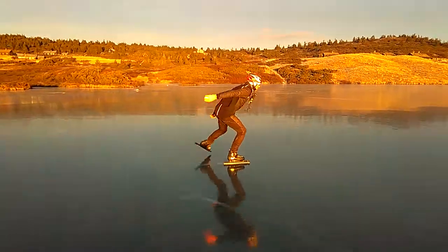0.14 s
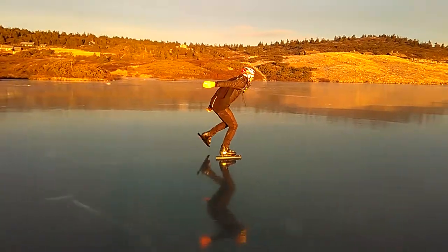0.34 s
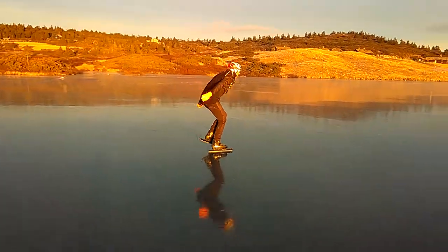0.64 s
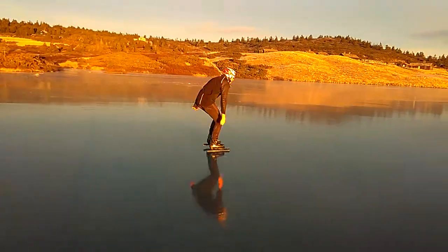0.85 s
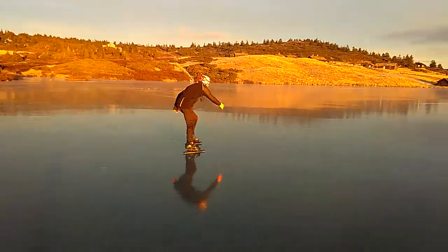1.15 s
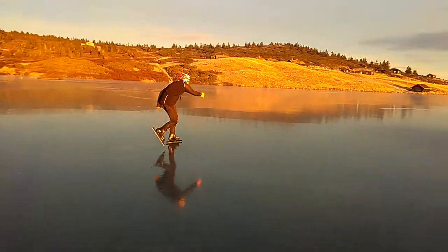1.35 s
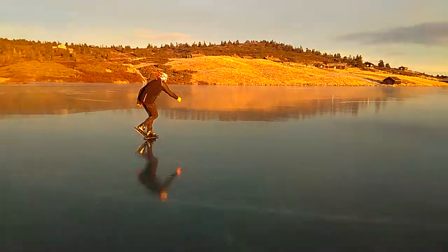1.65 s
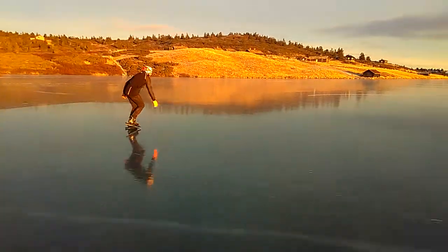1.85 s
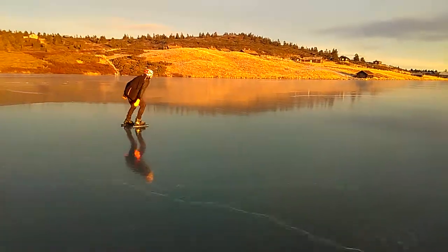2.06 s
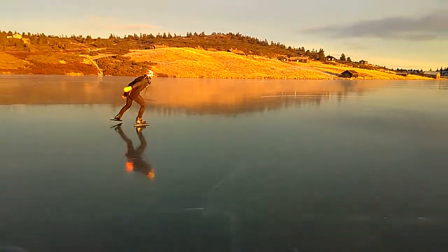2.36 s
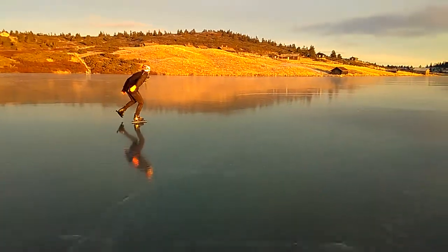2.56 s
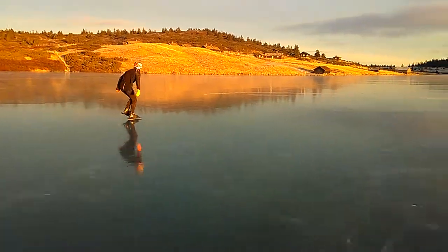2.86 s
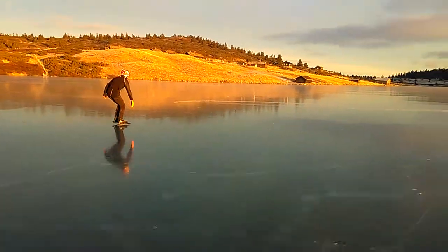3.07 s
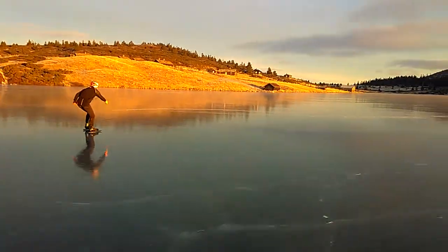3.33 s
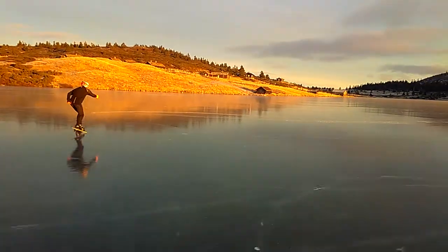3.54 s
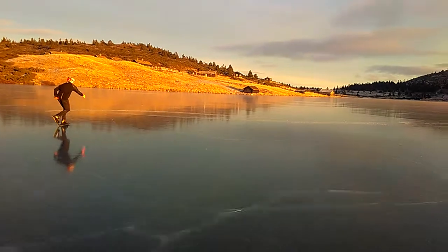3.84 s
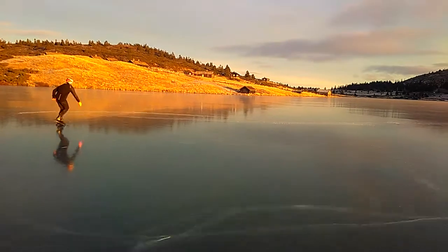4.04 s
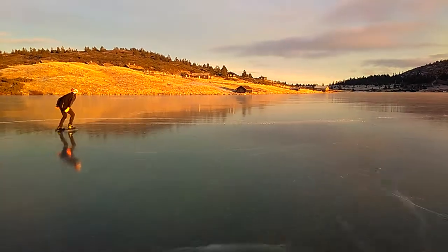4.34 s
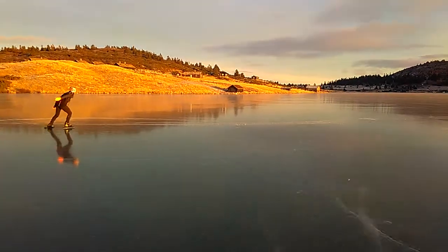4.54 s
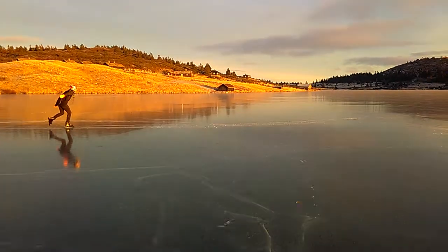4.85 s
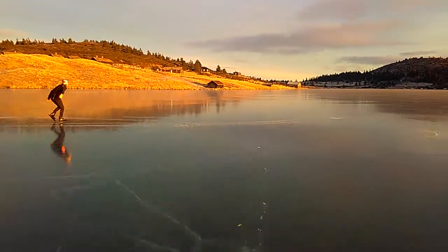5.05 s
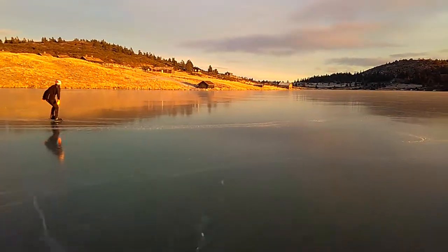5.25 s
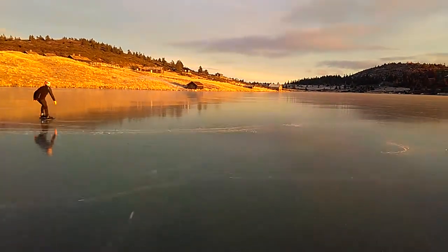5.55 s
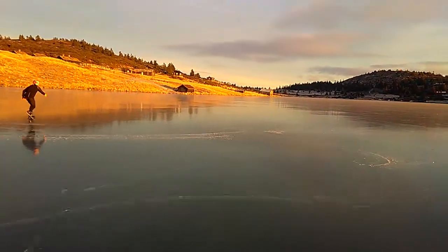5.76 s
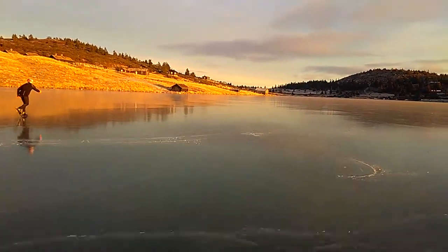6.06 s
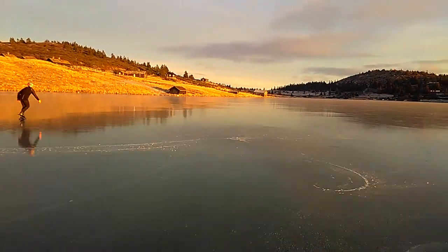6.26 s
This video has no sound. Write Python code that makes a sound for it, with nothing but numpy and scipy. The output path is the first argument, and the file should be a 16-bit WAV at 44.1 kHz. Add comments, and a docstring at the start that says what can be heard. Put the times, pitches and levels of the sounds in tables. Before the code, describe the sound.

Long steel skate blades run over bare lake ice, close to a moving microphone. Wind buffets first, then hollow knocks and scrapes arrive, crowding into a loud clatter through the middle. A brief lull follows, then looser clusters of knocks and crunches. Low wind rumble swells in separate gusts on the left and right throughout, with no echo from the open lake.

```python
"""Skate blades hiss, scrape and knock across a frozen lake while wind buffets two moving microphone ports.
Gliding edges are coloured friction noise, which grows louder and rasps where an edge bites.
Each knock over a bump is a short falling ring of the ice sheet with a thud and chipped crumbs;
a loaded edge splinters the ice in bright crackles, and a blade set down hard rings.
A headwind and single gusts are noise, separate at each port; loud wind and hard knocks overload the input."""
import sys
import numpy as np
from scipy import signal
from scipy.fft import rfft, irfft
from scipy.io import wavfile
from scipy.ndimage import uniform_filter1d

SR = 44100
rng = np.random.default_rng(int(sys.argv[2]) if len(sys.argv) > 2 else 0)


def master(y):
    """Save y as 16-bit WAV."""
    cut = np.clip(np.atleast_2d(y).T, -1, 1)
    pcm = np.round(cut * 32767)  # scale
    wavfile.write(sys.argv[1], SR, pcm.astype(np.int16))


N = 282240

# hard blade knocks: (time [s], level [dB], middle pitch [Hz], ring length [ms],
# delay of the blade's second contact [ms], thud relative to the knock [dB], crunch of chipped ice [dB])
KNOCKS = [(0.4614, -6.5, 1750, 1.5, 1.06, 1, -24), (0.6, 2, 1190, 1, 1.2, -6.5, -30.0),
          (0.669, -7, 980, 1.2, 1.2, -2, -29), (0.9212, -4, 1210, 2.9, 1.08, -3, -17.5),
          (0.9576, 0.5, 870, 1.84, 2.37, -17, -35.0), (0.997, -7.5, 1140, 1.4, 0.68, 1, -24),
          (1.155, 0.5, 1150, 1.5, 1.46, -9, -26), (1.17, -1.5, 700, 1.4, 0.54, -8, -19),
          (1.1996, -8, 1200, 2.5, 1.07, 5, -8), (1.2681, -4.5, 1430, 1.4, 2.97, -1, -25),
          (1.356, -5.5, 1190, 2.8, 1.94, -4, -13.5), (1.377, -11, 1030, 2.9, 2.6, 7, -33),
          (1.4021, 7.5, 1270, 1.5, 1.1, -11, -8), (1.4367, -3, 1640, 1.1, 0.81, -5, -12),
          (1.5177, -3, 990, 3.5, 1.8, 2.5, -13), (1.5461, -9, 900, 1.4, 1.6, 2, -26),
          (1.585, -0.5, 1305, 3.8, 0.86, 0.5, -17), (1.63, -3, 1170, 2, 1.04, -0.5, -15),
          (1.6817, -3, 930, 1.25, 1.33, -4, -29), (1.7045, -2.5, 720, 2.2, 0.54, -13, -38),
          (1.7624, 5, 1030, 1.33, 1.8, -23, -9.5), (1.8103, 4.5, 665, 3.8, 0.76, -15, -13),
          (1.84, -6.5, 660, 1.4, 1.8, 4, -21), (1.946, -13, 1120, 2.5, 0.91, -2, -21),
          (1.9673, 5, 1590, 1.1, 0.9, -6.5, -19), (2.024, 8.5, 1030, 1.84, 0.45, -21, -34),
          (2.0644, -6, 1580, 1.4, 0.99, -9, -20), (2.1575, 4.5, 1060, 1.2, 1.8, -15, -20),
          (2.1871, 3.5, 1010, 1.5, 0.34, -4, -18), (2.2227, -3.5, 1200, 2.2, 0.5, 0.5, -46),
          (2.2678, 0.5, 1260, 1.46, 1.5, -2.5, -35), (2.304, 0.5, 1440, 1.2, 1.44, -8, -40),
          (2.3646, 10, 1350, 1.05, 1.37, -20, -33), (2.4001, -3, 1490, 2.3, 0.93, -4, -17.5),
          (2.4264, 9, 1070, 0.88, 0.98, -9, -8.5), (2.4463, -1, 1610, 1.9, 0.9, -8, -13),
          (2.4624, -3.5, 790, 1.7, 2.25, -18, -20), (2.4936, 5, 1260, 1.13, 0.65, -1.5, -8),
          (2.5455, 2.5, 1230, 1.6, 1.47, -7, -14), (2.581, 6, 1320, 2.4, 0.97, -16, 1.5),
          (2.5972, -2, 1250, 2.5, 0.8, -14, -15), (2.6115, 2, 1890, 1.1, 0.77, -29, -3.5),
          (2.6601, -8.5, 940, 1.05, 1.4, -2, -25), (2.7102, -6, 900, 1.8, 1.3, -8, -38),
          (2.7198, 3.5, 940, 1.34, 1.58, -11, -27), (2.7707, -8, 1070, 4.4, 0.7, 4, -41.0),
          (2.8295, -14, 1370, 2.7, 0.86, -18, -42), (2.8482, 1, 1020, 1.16, 1.5, -11, -36),
          (2.8845, -6, 1340, 2.5, 0.93, -14, -23), (2.9238, 7.5, 1180, 1.5, 1.47, -19, -3.5),
          (2.9509, 3, 920, 5, 0.49, -5, -14), (2.9872, -7, 1240, 4.8, 1.3, 4, -15),
          (3.0462, 2.5, 680, 0.98, 2, -3, -10), (3.1246, 2, 1140, 1.2, 1.34, -10, -11),
          (3.179, -3, 1340, 1.5, 2.3, 0, -6.5), (3.1951, 2, 1065, 2.3, 1.22, -10, -1.5),
          (3.23, -2.5, 1380, 4.6, 0.64, 2.5, -28.0), (3.262, -8, 1380, 2.8, 0.7, 2, -28),
          (3.2741, -3.5, 985, 2.6, 1.95, 0.5, -9.5), (3.2872, 1.5, 1400, 2.1, 0.76, -0.5, -24),
          (3.3559, -10, 1070, 2.4, 0.78, 2, -28), (3.4376, -9, 1000, 4, 3.27, -2, -13.5),
          (3.4845, -14.5, 970, 4.7, 2.03, 9, -12), (3.5696, 8.5, 1230, 2.24, 1.39, -14, -12),
          (3.603, -2.5, 1550, 3.1, 0.92, -4.5, -35.0), (3.636, 5, 1520, 0.95, 0.97, -8.5, -14),
          (3.6769, 2, 760, 3.4, 0.63, -12, -33.0), (3.705, 2, 1086, 4.3, 1.25, -2, -25),
          (3.752, 0.5, 930, 1.5, 1.95, -22, -16), (3.7669, -2.5, 1410, 1.4, 0.96, 4, -9),
          (3.8072, -3, 1270, 1.9, 0.75, -21, -12), (3.8306, 2, 1710, 0.97, 0.86, -3, -4),
          (3.8915, -4, 670, 1.8, 1.3, -6, -10.5), (3.921, 3.5, 1120, 1.75, 1.42, -28, -5),
          (3.931, -8, 1080, 2.9, 1.84, 3, -30), (3.953, -1, 1260, 4.2, 2, 1.5, -13),
          (3.9736, -3.5, 1140, 2.4, 1.4, 0, -11), (3.9968, -7.5, 1260, 3.7, 2.73, -2, -32),
          (4.0271, 0.5, 1320, 1.44, 0.88, -9, -11.0), (4.053, -2.5, 1570, 0.85, 0.74, -9, -29),
          (4.244, -7, 1280, 1.7, 0.6, -23, -31), (4.3865, -5.5, 1520, 2.2, 0.85, -4.5, -18.5),
          (4.4373, -8.5, 834, 1.6, 1.2, -6, -16), (4.55, -10.5, 1080, 5, 3.3, -11, -27),
          (4.6289, -8.5, 960, 2.4, 1.37, -10, -49), (4.7366, 1.5, 1290, 2.6, 0.94, -0.5, -8.5),
          (4.765, -9, 1360, 2, 0.97, -1, -21), (4.8159, -8.5, 1720, 2.2, 0.97, 7, -9),
          (4.8371, -9, 1350, 3.3, 1.15, 7, -19), (4.8875, -3, 1800, 1.5, 0.91, -14, -18),
          (4.9152, 1.5, 1930, 1.1, 0.82, -2, -12), (4.9319, -8, 1040, 1.2, 1.2, -4, -16),
          (4.94, -8.5, 1330, 3.5, 0.9, 2.5, -18), (5.0168, -10.5, 930, 1.7, 2, 6.5, -26.0),
          (5.0511, -1.5, 1090, 1.2, 1.63, -8, -25), (5.1275, 2.5, 1510, 1.2, 0.89, -18, -7.5),
          (5.2467, -10.5, 1610, 2.4, 0.88, -28, -28), (5.265, -18, 970, 3.6, 1.9, 3, -21.5),
          (5.3131, -6, 1500, 0.99, 0.74, 1.5, -8.5), (5.3623, -4, 1320, 1.9, 1.5, -0.5, -11),
          (5.377, 6, 680, 0.61, 0.87, -17, -13), (5.4188, 1.5, 1170, 2.1, 1.85, 1, -12),
          (5.4294, -0.5, 1060, 2, 1.26, -11, -17), (5.4653, -2.0, 1205, 5.1, 1, 2, -13.5),
          (5.5026, -6, 1310, 3.3, 0.95, 0.5, -32), (5.5369, -2, 690, 2.3, 0.63, -5, -24),
          (5.5683, -4, 1980, 1.8, 0.58, -7.5, -3.5), (5.607, -9, 895, 2.4, 2, -18, -37),
          (5.6452, -2.5, 1200, 2.4, 0.84, -5, -9), (5.773, -17.5, 960, 5.8, 1.9, -6, -36),
          (5.8326, -12.5, 1000, 3.9, 1.8, -1, -41), (5.909, -8, 1150, 3.3, 2.66, -28, -32.0),
          (5.9436, -2.5, 990, 2.2, 0.63, -4.5, -20.0), (5.9889, -7, 760, 2, 0.67, 4.5, -28),
          (6.011, -18, 950, 1.3, 1, 5, -36), (6.032, -5.5, 1290, 2.3, 0.88, 2.5, -12.5),
          (6.1392, -2, 1270, 2.1, 0.84, -10, -15), (6.3071, -5.5, 830, 4.5, 0.75, -8, -14.5),
          (6.356, -6.5, 1270, 1.6, 0.96, -23, -17)]
# spectrum of ice grinding under the blade: (frequency [Hz], relative level [dB])
GRIND = [(200, -3.5), (600, -5), (1000, 4.5), (1500, 9), (2600, -5), (4000, -19), (7000, -26.5),
         (15000, -38)]
# spectrum of the shaving edge: (frequency [Hz], relative level [dB])
HISS = [(500, -26), (1500, 18.5), (3000, 0.5), (4500, 9), (6000, 4.5), (9000, 4.5), (12000, 3),
        (15000, 4.5)]


def from_db(db):
    """Turns decibels into gain."""
    return 10 ** (np.asarray(db) / 20)


def unit(x):
    """Scales to rms 1."""
    return x / np.sqrt(np.mean(x ** 2) + 1e-20)


def curve(table):
    """Reads the columns of a time table, sample by sample."""
    s, *columns = np.transpose(table)
    return [np.interp(np.arange(N) / SR, s, column) for column in columns]


def spectrum_at(points, hz):
    """Reads a spectrum on a log-frequency axis."""
    f, db = np.transpose(points)
    return np.interp(np.log(hz + 1), np.log(f), db)


def coloured(points):
    """Unrelated noise for the two ports, with the given spectrum."""
    gain = from_db(spectrum_at(points, np.fft.rfftfreq(N, 1 / SR)))
    white = rng.standard_normal((2, N))
    return unit(irfft(rfft(white) * gain, N))


def wander(rate_hz):
    """Smooth random movement of rms 1, mostly slower than the rate."""
    hz = np.fft.rfftfreq(N, 1 / SR)
    white = rng.standard_normal(N)
    return unit(irfft(rfft(white) * np.exp(-(hz / rate_hz) ** 2), N))


def shared(pair, likeness):
    """Makes the two channels partly alike."""
    c = np.clip(likeness, 0, 1)
    return np.array([pair[0], c * pair[0] + np.sqrt(1 - c ** 2) * pair[1]])


def add(mix, s, sound):
    """Mixes a sound in at time s."""
    part = mix[..., max(round(s * SR), 0):][..., :sound.shape[-1]]
    part += sound[..., :part.shape[-1]]


def random_hits(sizes, per_s, decay_s):
    """Sudden starts at random moments, each with a quick exponential decay."""
    starts = sizes * (rng.random(N) < per_s / SR)
    return signal.lfilter([1], [1, -np.exp(-1 / (decay_s * SR))], starts)


def patchy(x, depth_db, span_hz):
    """The ice under the edge keeps changing: patches of the spectrum swell and fade."""
    z = signal.stft(x, nperseg=512)[2]
    field = uniform_filter1d(rng.standard_normal(z.shape[1:]), size=6, axis=1)
    field = unit(uniform_filter1d(field, max(round(span_hz * 512 / SR), 1), axis=0))
    return signal.istft(z * from_db(depth_db * field), nperseg=512)[1][:, :N]


def wind_levels():
    """Gains of rumble and eddies at each port: the headwind, and gusts that swell and fade, leaning to a side."""
    # headwind: (time [s], rumble [dB], fast eddies [dB], left minus right [dB])
    headwind = [(0.0, -27, -11, 8), (0.45, -21.5, -15, 3), (1.45, -20, -14.5, 2.5), (2.0, -17, -24.5, -0.5),
                (2.9, -21.5, -25, -5), (3.3, -16.5, -34.5, -0.5), (3.95, -21.5, -24.5, -3.5),
                (4.25, -17, -27, 1.5), (5.05, -19.5, -22, -6), (5.45, -23, -36.5, -5),
                (5.8, -28, -26.5, -23), (6.05, -29, -26, 11.5), (6.4, -16, -42, -5)]
    # gusts: (peak time [s], length [s], rumble [dB], fast eddies [dB], left minus right [dB])
    gusts = [(0.043, 1, -13, -8, 21), (0.476, 0.36, -11, -1, -25), (0.67, 1, -10, -16.5, -21),
             (0.832, 0.32, -10, -7.5, 26), (1.1, 0.25, -8.5, -4, -8), (1.234, 0.17, -5, -4.5, 1),
             (1.646, 0.18, -11.5, -32, 20), (1.774, 0.27, -12, -10.5, -22), (1.94, 0.2, -26, -12.5, -21),
             (2.05, 0.21, -8.5, -27, -25), (2.4, 0.66, -11.5, -22, 4), (2.697, 0.19, -5, -9.5, -17),
             (3.118, 0.24, -6.5, -12.5, -8.5), (3.367, 0.2, -4, -8, -25), (3.532, 0.18, -8, -14, -8),
             (3.793, 0.4, -10, -11, -6), (4.08, 0.26, -12, -37, 12), (4.183, 0.12, -7.5, -6, -14),
             (4.46, 0.23, -8, -11.5, -28), (4.816, 0.2, -7.5, -20, -26), (5.19, 0.2, -10.5, -36, 0),
             (5.295, 0.17, -12.5, -31, 18), (5.628, 0.18, -15, -27, 10), (5.868, 0.36, -6, -30, -18),
             (6.106, 0.15, -9.5, -20, 1), (6.2, 0.52, -13.5, -24.5, -11), (6.341, 0.14, -12, -11.5, -10)]
    rumble_db, eddy_db, side_db = curve(headwind)
    power = (from_db([rumble_db, eddy_db])[:, None] * from_db([side_db / 2, -side_db / 2])) ** 2
    t = np.arange(N) / SR
    for s, length, gust_rumble_db, gust_eddy_db, lean_db in gusts:
        during = abs(t - s) < length / 2
        swell = np.cos(np.pi * (t[during] - s) / length) ** 2
        ports = from_db([lean_db / 2, -lean_db / 2])
        gains = np.outer(from_db([gust_rumble_db, gust_eddy_db]), ports / np.linalg.norm(ports))
        power[..., during] += (gains[..., None] * swell) ** 2
    return np.sqrt(power)


def swelling(depth_db, rate_hz, limit=1.46):
    """A gain of rms 1 for each port that rises and falls by chance, its peaks held down."""
    chance = np.array([wander(rate_hz), wander(rate_hz)])
    return unit(from_db(depth_db * np.minimum(chance, limit)))


def flow(points, span_s, firmness):
    """Turbulence with its slow level swings evened out, so that the wind gains set its strength."""
    noise = coloured(points)
    power = uniform_filter1d(noise ** 2, int(span_s * SR) + 1, axis=1)
    return unit(noise / (abs(power) + 1e-6) ** (firmness / 2))


def wind(burst_db=6.5, burst_hz=30, swirl_db=-1.0, lump_db=2.0, lump_hz=12, strongest=0.96):
    """Big slow eddies rumble; small fast ones hit each port in bursts and break into a swirl when strong."""
    # spectra of big eddies, small eddies and swirling air: (frequency [Hz], relative level [dB])
    rumble_spectrum = [(15, -57), (30, -32), (45, -7), (58, 0), (100, -4.5), (160, -12), (300, -28),
                       (700, -53.5)]
    eddy_spectrum = [(50, -6.5), (130, -2.5), (220, -0.5), (330, -6), (500, -16.5), (750, -25), (2000, -73)]
    swirl_spectrum = [(120, -20), (320, -7), (500, 6), (850, -14.5), (1500, -13), (3000, -33), (8000, -64)]
    rumble_gain, eddy_gain = wind_levels()
    bursts = eddy_gain * swelling(burst_db, burst_hz)
    lumps = swelling(lump_db, lump_hz)
    rumble = rumble_gain * lumps * flow(rumble_spectrum, span_s=0.101, firmness=1.0)
    eddies = bursts * lumps * flow(eddy_spectrum, span_s=0.036, firmness=0.52)
    # the swirl grows with the square of the bursts, up to a limit
    swirl = from_db(swirl_db) * np.minimum(bursts, 0.3) ** 2 * coloured(swirl_spectrum)
    return strongest * np.tanh((rumble + eddies) / strongest) + swirl


def blade_levels(bite_s=0.0024, let_go_s=0.014):
    """Gains of hiss, grind and rasp: the base glide, and each scrape with its attack, hold and release."""
    # base glide, ahead of the layer trims: (time [s], edge hiss [dB], ice grind [dB], rasp [dB])
    base_glide = [(0.0, -30, -32, -39), (0.55, -47, -31.5, -47), (1.1, -37, -28.5, -46),
                  (1.9, -34, -30.5, -41), (2.8, -32, -27.5, -57), (3.45, -38, -28.5, -47),
                  (4.05, -35, -35, -45), (4.33, -39.5, -35.5, -52), (4.65, -38.5, -28.5, -55),
                  (5.1, -41, -32, -64), (5.85, -36, -36, -72), (6.4, -34, -31.5, -36)]
    # scrapes, where an edge bites, ahead of the trims:
    # (start [s], length [s], hiss [dB], grind [dB], rasp [dB])
    scrapes = [(0.0, 0.032, -33, -55, -28), (0.564, 0.1, -40, -25.5, -35.5),
               (0.917, 0.095, -30.5, -23.5, -33), (1.188, 0.093, -33, -40, -30),
               (1.284, 0.194, -31, -48, -33), (1.497, 0.2, -34.5, -24.5, -30.5),
               (1.752, 0.11, -40, -20, -32), (2.176, 0.033, -31, -12, -31), (2.576, 0.016, -16, -9, -13.5),
               (2.605, 0.016, -30, -28, -28), (2.913, 0.047, -29, -34, -24.5), (3.157, 0.15, -36, -21, -33),
               (3.562, 0.177, -26.5, -22, -50), (3.793, 0.29, -37, -31.5, -61),
               (4.802, 0.18, -36, -31, -60), (5.338, 0.17, -33, -30.5, -40), (5.561, 0.15, -35, -32.5, -58),
               (6.01, 0.062, -41, -28, -55),]
    t = np.arange(N) / SR
    power = from_db(curve(base_glide)) ** 2
    for start, length, *levels_db in scrapes:
        age = t[:round((length + 8 * let_go_s) * SR)]
        attack = np.minimum(age / bite_s, 1)
        release = np.exp(-np.maximum(age - length, 0) / let_go_s)
        add(power, start, np.outer(from_db(levels_db), attack * release) ** 2)
    return np.sqrt(power)


def scrape(points, likeness, flutter_db):
    """Friction noise of rms 1 that flutters with the pressure and breaks into grains."""
    noise = patchy(shared(coloured(points), likeness), depth_db=3.6, span_hz=700)
    grains_db = 2.6 * wander(rate_hz=900)
    pressure_db = flutter_db * wander(rate_hz=36)
    return unit(noise * from_db(pressure_db + grains_db))


def slips(per_s=130, spread_db=-1.0, decay_s=0.007):
    """The biting edge sticks and slips: an envelope of rms 1 made of sudden starts and quick decays."""
    sizes = from_db(spread_db * rng.uniform(-0.92, 1, N))
    return unit(random_hits(sizes, per_s, decay_s))


def glide(hiss, grind, rasp, hiss_trim_db=0.5, rasp_trim_db=3.5, grind_trim_db=-6.0):
    """The steel edge shaves the ice: fine hiss, a rasp that comes in slips and a low grind."""
    # spectrum of a blade set on edge: (frequency [Hz], relative level [dB])
    rasp_spectrum = [(1500, -9), (2600, -5), (4000, 20), (5000, 5), (6000, 5), (7500, -23), (12000, -24)]
    shaving = hiss * scrape(HISS, likeness=0.057, flutter_db=2.5)
    rasping = rasp * slips() * scrape(rasp_spectrum, likeness=0.23, flutter_db=3.0)
    grinding = grind * scrape(GRIND, likeness=0.4, flutter_db=6.0)
    return (from_db(hiss_trim_db) * shaving + from_db(rasp_trim_db) * rasping
            + from_db(grind_trim_db) * grinding)


def scratches(hiss, per_s=90, scratch_db=0.0, spread_db=2.5, decay_s=0.0041):
    """Tiny flakes snap off under the edge, the stronger the harder it shaves."""
    sizes = from_db(spread_db * np.minimum(rng.exponential(1, N), 3))
    bursts = random_hits(sizes, per_s, decay_s)
    return from_db(scratch_db) * hiss * bursts * shared(coloured(HISS), likeness=0.14)


def chatter(grind, per_s=65, chatter_db=4.5):
    """Small bumps tick under the loaded blade at random, louder as it grinds, in shifting colours."""
    sizes = from_db(rng.uniform(-6, 6, N))
    ticks = random_hits(sizes, per_s, decay_s=0.003)
    ice = unit(patchy(shared(coloured(GRIND), likeness=0.75), depth_db=5.0, span_hz=350))
    return from_db(chatter_db) * grind * ticks * ice


def crackles(crackle_db=3.5):
    """The loaded edge splinters the ice in sudden, grainy noise bursts of shifting colour."""
    # crackles, ahead of the trim crackle_db: (time [s], decay [s], level [dB])
    splinterings = [(0.9394, 0.0058, -25), (1.202, 0.011, -16.5), (1.255, .007, -26), (1.2896, 0.013, -21),
                    (1.312, 0.0065, -23), (1.335, 0.018, -23), (1.4996, 0.0046, -24), (1.5445, 0.0062, -20),
                    (1.588, .007, -19), (1.6535, 0.0053, -16.5), (1.6964, .005, -17), (5.633, 0.0064, -19),
                    (6.034, 0.0053, -19), (6.202, 0.0023, -15.5)]
    # spectrum of splintering ice: (frequency [Hz], relative level [dB])
    splinter_spectrum = [(800, -24), (2000, -9), (3800, 4), (5200, 6.5), (6800, 1), (9000, -3), (14000, -9)]
    bursts, t = np.zeros(N), np.arange(SR // 10) / SR
    for s, decay_s, db in splinterings:
        add(bursts, s, from_db(db) * np.exp(-t / decay_s))
    splinters = patchy(shared(coloured(splinter_spectrum), likeness=0.4), depth_db=4.5, span_hz=900)
    grains = from_db(5 * wander(rate_hz=1500))
    return from_db(crackle_db) * bursts * unit(splinters * grains)


def blade_rings(sag=0.05, sag_s=0.0061, detune=0.017):
    """A blade set down hard rings in its modes, a little different each time, sagging as weight comes on."""
    # hard set-downs of the steel blade: (time [s], level [dB])
    set_downs = [(1.401, -14), (2.582, -7), (2.926, -11)]
    # modes of the blade: (settled pitch before detuning [Hz], relative level [dB], time to fall 60 dB [s])
    modes = [(1700, 2.5, 0.17), (4100, 2, 0.054)]
    rings, t = np.zeros(N), np.arange(SR // 10) / SR
    chance = rng.uniform(-0.68, 1, (len(set_downs), len(modes)))
    for (s, db), offsets in zip(set_downs, chance):
        for (hz, mode_db, t60), offset in zip(modes, offsets):
            pitch = hz * (1 + detune * offset) * (1 + sag * np.exp(-t / sag_s))
            tone = np.sin(2 * np.pi * np.cumsum(pitch) / SR)
            decay = np.exp(-np.log(1000) * t / t60)
            add(rings, s, from_db(db + mode_db) * decay * tone)
    return rings


def ice_ring(hz, length_ms, fall=0.34, rise_ms=0.35, tail=0.15, tail_ms=2.5):
    """A knock's few cycles: short bending waves outrun long ones in the ice, so the pitch falls."""
    age_ms = np.arange(SR // 10) * 1000 / SR
    # the pitch starts above hz and ends below it by the same share
    pitch = hz * (1 - fall + 2 * fall * np.exp(-age_ms / (0.9 * length_ms)))
    rise = 1 - np.exp(-(age_ms / rise_ms) ** 2)
    packet = np.exp(-(age_ms / length_ms) ** 2) + tail * np.exp(-age_ms / tail_ms)
    return rise * packet * np.sin(2 * np.pi * np.cumsum(pitch) / SR)


def soft_knocks(grind, per_s=30, over_grind_db=11.5, spread_db=-4.5, most_db=-17, clear_s=0.014):
    """Rows like those of the hard knocks, for lesser bumps in between, as strong as the blade grinds."""
    middle_hz, ring_ms, bounce_ms, thud_db, crunch_offset_db = 1120, 2.32, 0.99, -1, -17.5
    chance = rng.uniform(-1, 1, (200, 4))
    hard_s = np.transpose(KNOCKS)[0]
    rows = []
    for k, (delay, size, pitch, crunch) in enumerate(chance):
        s = (k + 0.5 + delay / 2) / per_s
        if s < N / SR and abs(hard_s - s).min() > clear_s:
            grind_db = 20 * np.log10(grind[int(s * SR)])
            db = min(grind_db + over_grind_db, most_db) + spread_db * size  # capped, then spread
            crunch_db = db + crunch_offset_db + 9 * crunch
            rows.append((s, db, middle_hz * 1.4 ** pitch, ring_ms, bounce_ms, thud_db, crunch_db))
    return rows


def knocks(grind, thud_hz=450, rattle_db=-18.0, ring_db=-2.0, rattle_tail=0.047):
    """Each bump clicks, rings twice and thuds in the ice, rattles the blade and chips off a spray of crumbs."""
    # spectrum of chipped ice: (frequency [Hz], relative level [dB])
    crunch_spectrum = [(300, -13), (1200, 5.5), (2600, 20), (3800, 9), (5500, 8), (9000, 3.5), (12000, -2),
                       (15000, 7)]
    bounce_db = -0.5  # second contact against the first; its delay colours the knock
    click_db, click_s = -18, 0.00033  # first contact of steel and bump, relative to the knock
    rings, rattle, spray = np.zeros((3, N))
    t = np.arange(SR // 10) / SR
    click = from_db(click_db) * (1 - t / click_s) * np.exp(-t / click_s)
    rattle_shape = np.exp(-t / 0.0045) + rattle_tail * np.exp(-t / 0.01)
    spray_shape = np.exp(-t / 0.003) + 0.089 * np.exp(-t / 0.029)
    thud_shape = (1 - np.exp(-t / 0.00051)) * np.exp(-t / 0.0023)
    for s, db, hz, ring_ms, bounce_ms, thud_db, crunch_db in list(KNOCKS) + soft_knocks(grind):
        low_hz = thud_hz * (hz / 1000) ** 0.37  # higher knocks thud a little higher
        thud = from_db(thud_db) * thud_shape * np.sin(2 * np.pi * low_hz * t)
        ring = from_db(ring_db) * ice_ring(hz, ring_ms)
        add(rings, s, from_db(db) * (ring + thud + click))
        add(rings, s + bounce_ms / 1000, from_db(db + bounce_db) * ring)
        add(rattle, s, from_db(db) * rattle_shape)
        add(spray, s, from_db(crunch_db) * spray_shape)
    rattle_noise = patchy(shared(coloured(GRIND), likeness=1.0), depth_db=7.0, span_hz=350)
    blade = from_db(rattle_db) * rattle * rattle_noise
    grains = from_db(3 * wander(rate_hz=1200))
    chips = patchy(shared(coloured(crunch_spectrum), likeness=0.5), depth_db=3.5, span_hz=900)
    crumbs = spray * unit(grains * chips)
    return rings + blade + crumbs


def scene():
    """Wind on the ports, and the blades' glide, scratches, chatter, crackles, rings and knocks."""
    hiss, grind, rasp = blade_levels()
    friction = glide(hiss, grind, rasp) + scratches(hiss) + chatter(grind)
    return wind() + friction + crackles() + blade_rings() + knocks(grind)


def port(x, gain_db):
    """Causal minimum-phase filter with the given gain on an even frequency grid."""
    circle = np.log(from_db(np.r_[gain_db, gain_db[-2:0:-1]]))
    taps = np.fft.ifft(np.exp(np.conj(signal.hilbert(circle)))).real
    return signal.oaconvolve(x, taps[:len(gain_db)])[:N]


def record(dry, ceiling=0.59, knee=19.0, low_cut_hz=14, high_cut_hz=14500):
    """Each port adds its colour, the input overloads, and the lowest bass and highest treble are cut."""
    # colour of each microphone port: (frequency [Hz], gain [dB])
    left_colour = [(400, 1.5), (720, 1), (1000, -1), (1600, -5.5), (2000, -14), (2500, -3), (3400, -14),
                   (4900, -21), (6200, -8), (7000, -10), (9000, -6.5), (12500, -14.5)]
    right_colour = [(400, 2.5), (850, -1.5), (1400, -17), (1950, -15), (2500, -2), (3000, -6.5), (4050, -9),
                    (5000, -10.5), (6000, -4.5), (7000, -10), (11000, -8.5), (14500, -18)]
    # narrow resonances added to the left port's colour: (frequency [Hz], width [Hz], gain [dB])
    left_peaks = [(1320, 200, 1), (7600, 490, 6.5), (9000, 910, 10), (13340, 770, 10)]
    hz = np.fft.rfftfreq(4096, 1 / SR)
    peaks_db = sum(db / (1 + (2 * (hz - f) / width) ** 2) for f, width, db in left_peaks)
    left = port(dry[0], spectrum_at(left_colour, hz) + peaks_db)
    right = port(dry[1], spectrum_at(right_colour, hz))
    pair = np.array([left, right])
    squashed = pair / (1 + abs(pair / ceiling) ** knee) ** (1 / knee)
    bass_cut = signal.lfilter(*signal.butter(1, low_cut_hz, "high", fs=SR), squashed)
    treble_cut = signal.firwin(201, high_cut_hz, window=("kaiser", 8), fs=SR)
    return signal.oaconvolve(bass_cut, treble_cut[None], "same", axes=1)


dry = scene()
out = record(dry)
master(out)
```